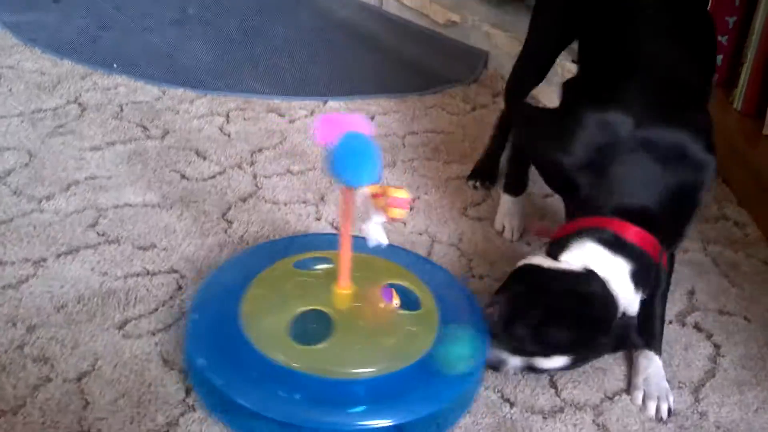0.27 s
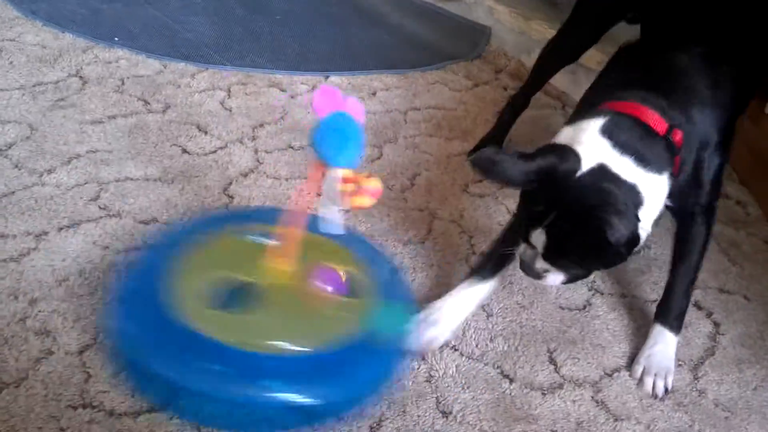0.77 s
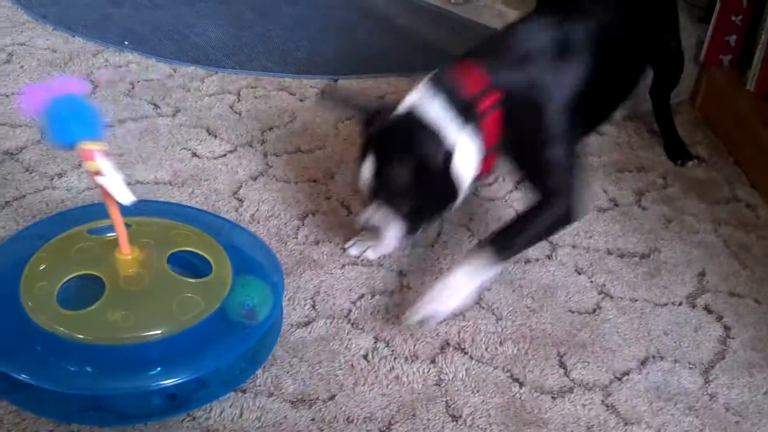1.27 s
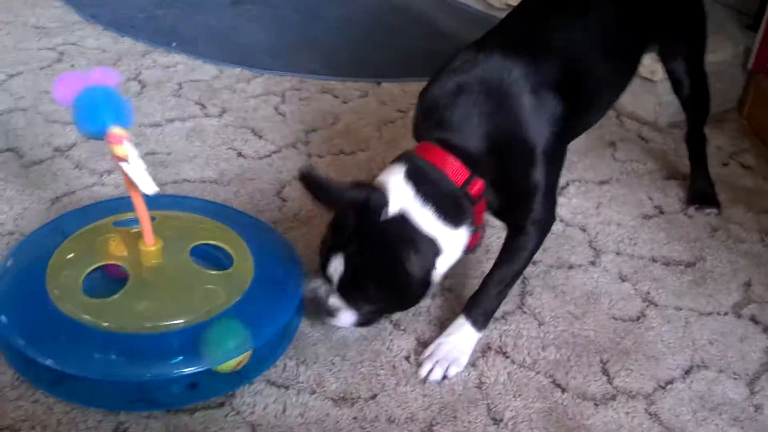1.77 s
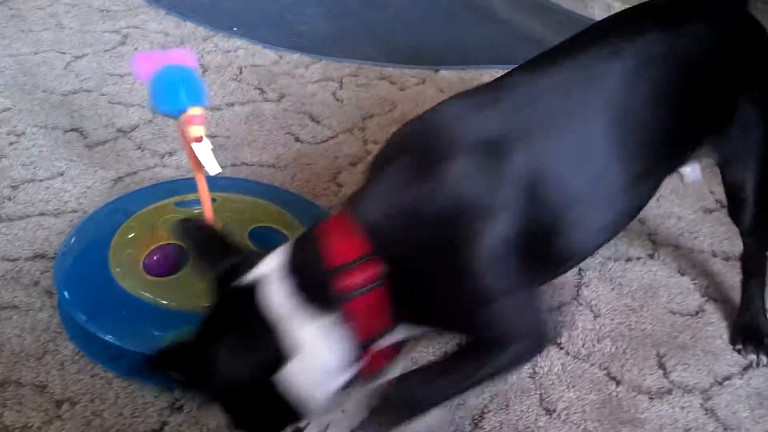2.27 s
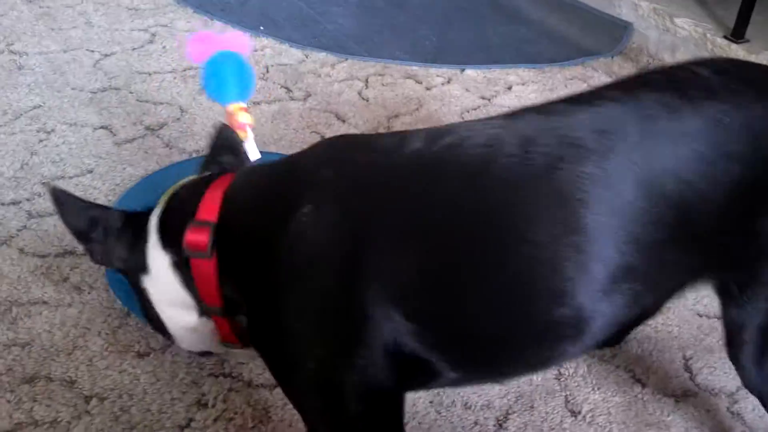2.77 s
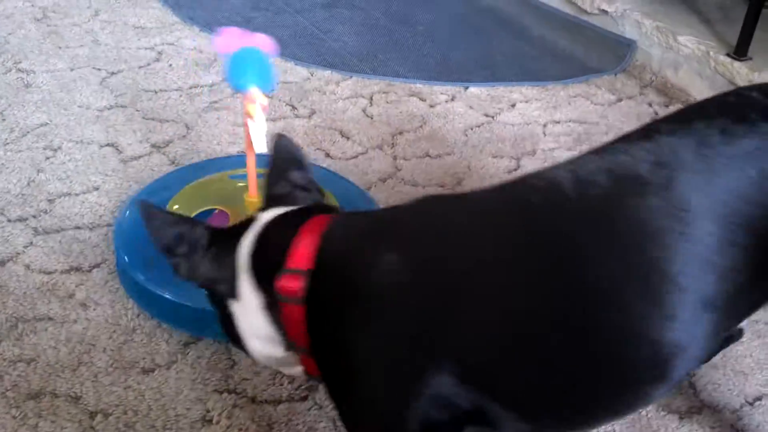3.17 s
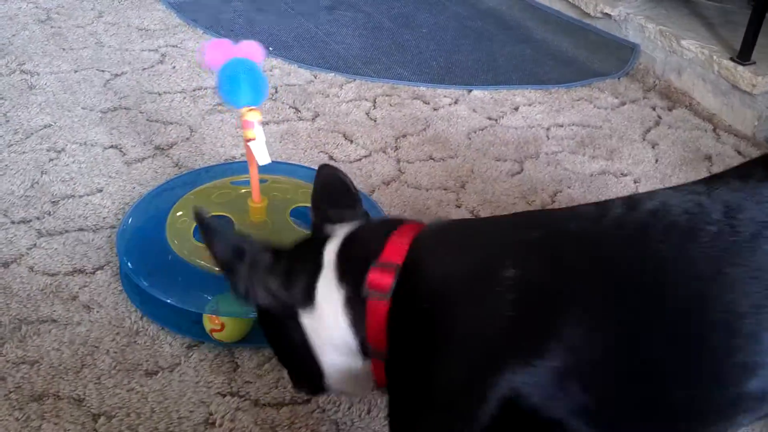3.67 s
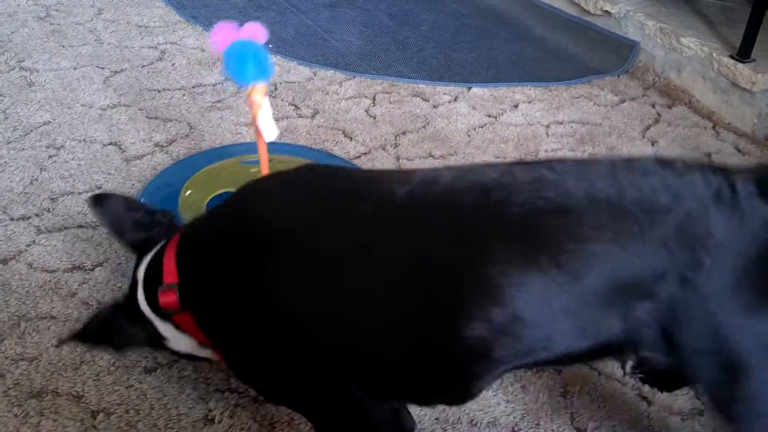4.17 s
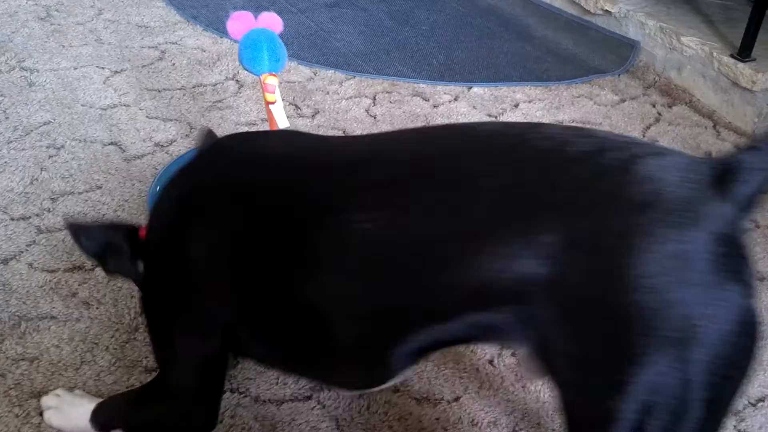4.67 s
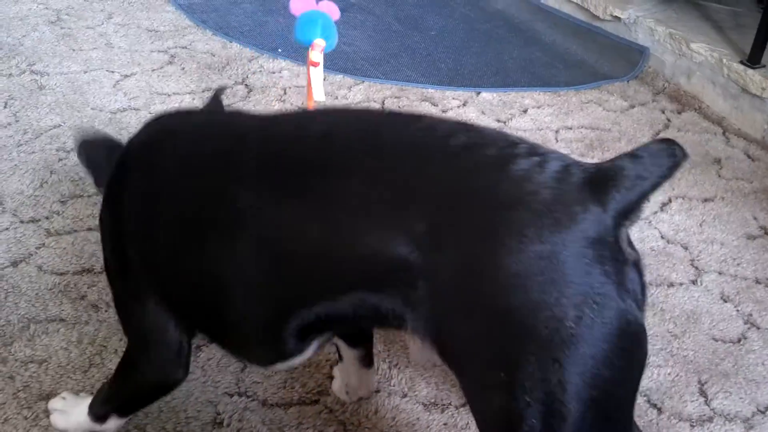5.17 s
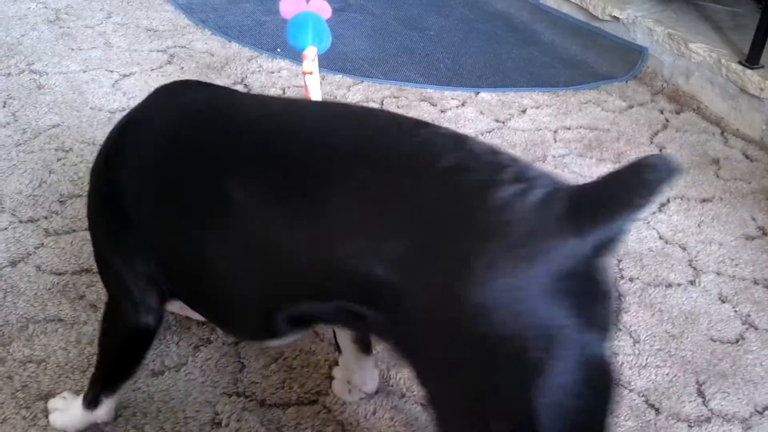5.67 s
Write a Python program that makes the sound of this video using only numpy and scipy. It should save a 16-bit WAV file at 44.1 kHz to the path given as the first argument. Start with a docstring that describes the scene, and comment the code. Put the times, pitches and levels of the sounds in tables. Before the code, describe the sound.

Irregular hollow plastic knocks and a pattering ball as a dog nudges a toy indoors, with light tag jingles and snuffles.

```python
"""A small dog plays with a round plastic track toy on a carpet, a metre away. Over a faint room hum its paws
thump and its collar tag tinkles in high metal modes. Then blows set the toy's hollow shell ringing, claws
click on the rim, the nose puffs turbulent air and the shoved ball patters round its track. These return in
uneven bouts, the hardest knock near 3 s. Throughout, a small living room reflects each sound, and two
microphone ports that partly cancel each other give a wide image."""
import sys
import numpy as np
from scipy import signal
from scipy.fft import rfft, irfft, next_fast_len
from scipy.io import wavfile

SR = 44100
rng = np.random.default_rng(int(sys.argv[2]) if len(sys.argv) > 2 else 0)


def persist_wave(psi):
    """Save psi, clipped to +-1, as 16-bit WAV."""
    counts = np.round(np.clip(psi, -1, 1) * 32767).astype(np.int16)
    wavfile.write(sys.argv[1], SR, np.atleast_2d(counts).T)


N = 260631
TIME = np.arange(N) / SR
PORT_GAP_SAMPLES = 16  # travel time of sound between the two ports

# spectrum of a hard contact's sharp tick: frequency_hz, level_db
TICK_SPECTRUM = [(3500, -11.5), (6000, -7.5), (8700, -0.5), (11000, 0.5), (13500, -8), (16000, 3.5)]
# spectrum of the plastic rim's clack: frequency_hz, level_db
CLACK_SPECTRUM = [(1200, -21), (1900, 8.5), (2400, 3.5), (2900, 0), (3500, 1.5), (4400, -7), (5500, -16),
                  (9000, -42)]


def undb(db):
    """Decibels to amplitude ratio."""
    return 10 ** (np.asarray(db) / 20)


def along(rows, hz, axis=1):
    """Interpolation of a table column over log frequency."""
    rows = np.array(rows, float)
    return np.interp(np.log(hz + 1), np.log(rows[:, 0]), rows[:, axis])


def colour(x, spectrum):
    """Linear filtering by a spectrum of frequency_hz, level_db points."""
    size = next_fast_len(x.shape[-1] + 512)
    gain = undb(along(spectrum, np.fft.rfftfreq(size, 1 / SR)))
    return irfft(rfft(x, size) * gain, size)[..., :x.shape[-1]]


def noise(spectrum, size):
    """Incoherent coloured noise at the two ports, rms 1."""
    x = colour(rng.standard_normal((2, size)), spectrum)
    return x / x.std()


def diffuse(x):
    """Diffuse-field coherence: the ports are alike in the bass, unrelated in the treble."""
    size = next_fast_len(x.shape[-1])
    coherence = .9 * np.sinc(2 * np.fft.rfftfreq(size) * PORT_GAP_SAMPLES)
    mid, side = irfft(rfft(x, size) * np.sqrt([1 + coherence, 1 - coherence]), size)[:, :x.shape[-1]]
    return np.array([mid + side, mid - side]) / np.sqrt(2)


def from_left(x, lag_s=.00007, far_db=-0.3):
    """Path difference: a near source reaches the right port later and weaker."""
    i = np.arange(len(x))
    return np.array([x, undb(far_db) * np.interp(i - lag_s * SR, i, x)])


def add(out, start_s, x):
    """Superposition of a sound from start_s on."""
    i = max(int(start_s * SR), 0)
    out[:, i:i + x.shape[-1]] += x[:, :max(N - i, 0)]


def flex(t, hz, cycles):
    """Damped oscillation of a surface pushed in and springing back, peak near 1."""
    turns = t * hz
    swell = (1 - np.exp(-(turns / 0.72) ** 2)) * np.exp(-turns / (1.09 * max(cycles, .1)))
    return swell / swell.max() * np.sin(2 * np.pi * turns)


def ring(t, modes, scatter_db, detune):
    """Free decay of normal modes; every blow lands elsewhere and weights them anew."""
    hz, db, t60 = np.transpose(modes)[:, :, None]
    weight, shift, phase = rng.standard_normal((3, len(modes), 1))
    swing = np.sin(2 * np.pi * (hz * (1 + detune * shift) * t + phase))
    return undb(db + scatter_db * weight - 60 * t / t60) * swing


def crack(spectrum, t, rise_s, fall_s):
    """A contact transient: a noise burst whose energy is set by its envelope."""
    envelope = (1 - np.exp(-t / rise_s)) * np.exp(-t / fall_s)
    burst = noise(spectrum, len(t)) * envelope
    return burst * np.linalg.norm(envelope) / np.linalg.norm(burst, axis=1, keepdims=True)


def background():
    """A diffuse field of rumble and hiss, with a hum modulated in amplitude and phase."""
    # course of the background: time_s, level_db
    levels = [(0, -57), (.28, -51.5), (.5, -60.5), (.78, -61), (1.2, -73), (1.7, -70), (2.3, -62),
              (3.9, -59), (4.5, -54), (5.91, -55)]
    # rumble and hiss: frequency_hz, level_db
    air_spectrum = [(30, -16.5), (70, -3.5), (120, 0.5), (200, -0.5), (330, -4), (700, -7), (1400, -9.5),
                    (2400, -18), (4000, -21), (8000, -27.5), (12000, -26), (16000, -20.5)]
    hum_hz = 120.6
    waver = np.interp(TIME, np.linspace(0, TIME[-1], 30), rng.standard_normal(30))
    hum = undb(2 * waver) * np.sin(2 * np.pi * hum_hz * TIME + 0.45 * waver)
    ambience = diffuse(noise(air_spectrum, N)) + from_left(hum, lag_s=0.00014, far_db=-5)
    return ambience * undb(np.interp(TIME, *np.transpose(levels)))


def paws():
    """Soft impact: paws and the toy's base on the carpet excite only low, damped swings."""
    # thumps on the carpet: start_s, level_db, pitch_hz
    thumps = [(0.03, -61, 132), (.15, -42, 137), (0.546, -53, 142), (.795, -65, 54.6), (2.154, -52, 139),
              (2.998, -50, 50), (3.538, -37, 145), (4.563, -45.5, 149), (4.67, -48.5, 80)]
    out = np.zeros((2, N))
    for start, db, hz in thumps:
        add(out, start, from_left(undb(db) * flex(TIME[:SR // 5], hz, cycles=3.3)))
    return out


def tag():
    """Modal ringing of metal: the tag strikes its ring and rebounds twice, each time with a scrape."""
    # shakes of the collar: start_s, level_db
    shakes = [(.183, -44), (0.412, -32.5), (.505, -37), (.549, -36), (1.297, -57), (1.317, -50),
              (1.479, -45), (1.793, -54), (2.084, -41), (2.433, -44.5), (2.514, -48), (2.744, -48),
              (2.789, -41.5), (3.01, -31), (3.073, -41), (3.347, -47), (3.69, -50.5), (3.742, -51),
              (3.846, -52), (4.37, -35.5), (4.441, -44), (4.481, -42), (4.661, -42), (4.696, -42),
              (4.732, -41.5), (5.478, -46), (5.543, -44.5), (5.596, -32), (5.612, -41), (5.684, -37)]
    # modes of the free tag: frequency_hz, level_db, t60_s
    tag_modes = [(6890, -21.5, .05), (7400, -16.5, 0.15), (9240, -10, 0.073), (10060, -9, 0.082),
                 (11270, 2.5, 0.08), (11360, -1.5, 0.062), (11800, -14, .07), (12800, -2, 0.066),
                 (13190, -4, 0.046), (12920, 1, 0.2), (13500, -10, .04), (14900, -5, .06), (15280, -3, .09)]
    # faint clinks while the dog keeps its nose at the toy, one somewhere in each slot
    slot_s = .25
    jiggles = [(s + slot_s * rng.random(), -52.5 + 3 * rng.standard_normal())
               for s in np.arange(2.1, TIME[-1], slot_s)]
    out, t = np.zeros((2, N)), TIME[:SR // 8]
    collar_damping = np.exp(-t / 0.03)
    for start, db in shakes + jiggles:
        delays = np.cumsum([0, *rng.uniform(0.002, 0.0087, 2)])
        for bounce, delay in enumerate(delays):
            modes = ring(t, tag_modes, scatter_db=3.5, detune=0.0018) * collar_damping
            # a contact near a nodal line leaves that mode almost silent
            modes = modes * 1.47 * np.cos(rng.uniform(0, np.pi, (len(modes), 1)))
            # such short waves reach each port with their own sign
            tinkle = rng.choice([-1, 1], (2, len(modes))) @ modes
            scrape = crack(TICK_SPECTRUM, t, rise_s=0.00023, fall_s=0.002)
            add(out, start + delay, undb(db - 5 * bounce) * (undb(-10) * tinkle + undb(-1.5) * scrape))
    return out


def blow(knock_db, hz, tick_db, thud_db, cycles):
    """Impulse response of the toy: lid and base flex, the shell rings, the rim cracks, parts rattle."""
    # modes of the hollow shell: frequency_hz, level_db, t60_s
    shell_modes = [(197.6, -13.5, .18), (321, -16.5, 0.11), (375.3, -19, 0.15), (516.8, -9, 0.13),
                   (555, -15.5, .08), (644.6, -20.5, 0.24), (743, -26.5, 0.034), (849.8, -14, 0.037),
                   (919, -15, 0.11), (1060.6, -10, 0.072), (1137, -17.5, 0.063), (1203, -23, 0.087),
                   (1360, -13.5, 0.054), (1543, -16.5, 0.053), (1734, -24.5, 0.036), (1860, -35, 0.038)]
    # loose parts buzzing against the plastic: frequency_hz, level_db
    rattle_spectrum = [(1000, -22.5), (1800, 7.5), (2700, -0.5), (3600, 1.5), (5200, -9), (9000, -5.5),
                       (15000, -2.5)]
    t = TIME[:SR // 5]
    # the contact time picks out the modes near the blow's own pitch
    octaves_off = np.log2(np.array(shell_modes)[:, :1] / hz)
    excitation = (1 - np.exp(-t / 0.00083)) / (1 + (octaves_off / 1.22) ** 2)
    modes = excitation * ring(t, shell_modes, scatter_db=1.5, detune=0.011)
    # every mode radiates in its own pattern, so the two ports weight them differently
    directivity = 1 + 0.26 * rng.standard_normal((2, len(shell_modes)))
    shell = undb(knock_db - 3.5) * directivity @ modes
    lid = undb(knock_db) * flex(t, hz, cycles)
    base = undb(thud_db) * flex(t, 250 * np.exp(0.11 * rng.standard_normal()), cycles=0.46)
    panels = from_left(lid + base, lag_s=0.00013, far_db=-0.5)
    clack_db = 0.72 * knock_db + 0.28 * tick_db - 10.5
    clack = undb(clack_db) * crack(CLACK_SPECTRUM, t, rise_s=0.0006, fall_s=0.0027)
    tick = undb(tick_db + 1.5) * crack(TICK_SPECTRUM, t, rise_s=0.00018, fall_s=0.0017)
    # the rattle grows faster than the blow and comes in uneven spurts
    spurts = undb(5 * np.interp(t, np.linspace(0, t[-1], 70), rng.standard_normal(70)))
    rattle = undb(1.174 * knock_db - 25) * spurts * crack(rattle_spectrum, t, rise_s=0.0067, fall_s=0.025)
    return panels + shell + clack + tick + rattle


def knocks():
    """Impact excitation of the toy: soft, low blows push its base harder."""
    # blows on the toy: start_s, level_db, pitch_hz, tick_db
    strikes = [(0.2268, -25.5, 540, -57), (.232, -30, 646, -53), (.249, -28, 700, -70),
               (0.264, -29.5, 596, -22.5), (.3, -35, 1370, -26), (.317, -17, 1040, -22),
               (0.7114, -27.5, 630, -61), (0.7644, -22, 1210, -26), (0.7867, -25, 1220, -32),
               (0.8027, -22, 1230, -13), (.819, -25, 990, -49), (.927, -30, 660, -44),
               (1.01, -43.5, 520, -80.5), (1.526, -38.5, 1040, -40.5), (1.547, -36.5, 686, -46),
               (1.573, -32.5, 1010, -43), (1.5964, -30, 700, -33.5), (1.871, -43.5, 610, -63),
               (1.96, -47, 1000, -60), (2.234, -42, 642, -71.5), (2.429, -35, 800, -55),
               (2.434, -32.5, 940, -59), (2.454, -28.5, 634, -76), (2.566, -31, 830, -74),
               (2.672, -43, 514, -68), (2.796, -42, 580, -68), (2.94, -37.5, 1000, -29.5),
               (2.9704, -23, 793, -34.5), (2.991, -25.5, 720, -33), (2.998, -7.5, 1080, -27.5),
               (3.0223, -18.5, 925, -46), (3.061, -21, 627, -51), (3.1, -29, 1140, -45),
               (3.367, -36.5, 665, -72), (3.6206, -23.5, 1060, -47), (3.642, -27.5, 475, -63),
               (4.054, -27.5, 860, -42), (4.074, -16.5, 860, -67), (4.12, -19.5, 910, -28.5),
               (4.148, -22, 810, -58), (4.3508, -27.5, 434, -70), (4.6408, -33.5, 430, -70),
               (4.756, -27.5, 587, -82), (4.905, -41, 695, -72), (4.972, -35, 880, -48.5),
               (5.051, -35.5, 532, -77), (5.086, -33, 796, -72), (5.141, -29, 1200, -46),
               (5.2792, -21.5, 1057, -32.5), (5.299, -29, 760, -59), (5.7623, -20.5, 903, -55),
               (5.7818, -20.5, 1370, -26), (5.897, -36.5, 510, -68)]
    thud_db_per_octave = -8
    out = np.zeros((2, N))
    for start, db, hz, tick_db in strikes:
        thud_db = db - 11.5 + thud_db_per_octave * np.log2(hz / 835)
        add(out, start, blow(db, hz, tick_db, thud_db, cycles=0.6))
    return out


def ball_taps():
    """Elastic rebound: the ball springs clear, so its knocks ring a little longer, with a light thud."""
    # the ball against the wall of its track: start_s, level_db, pitch_hz
    taps = [(.3245, -18.5, 508), (1.607, -33.5, 1010), (1.71, -43.5, 960), (1.994, -39.5, 1050),
            (2.547, -26.5, 860), (2.601, -38.5, 845), (3.426, -45, 1136), (3.446, -34.5, 1016),
            (4.237, -27, 870), (5.1783, -18.5, 1000)]
    out = np.zeros((2, N))
    for start, db, hz in taps:
        add(out, start, blow(db, hz, tick_db=db - 31, thud_db=db - 14.5, cycles=2.34))
    return out


def claws():
    """Brief, hard contact: a claw ticks and clacks on the rim, too light to ring the shell."""
    # claws on the rim: start_s, level_db
    clicks = [(.3245, -23.5), (0.5656, -21.5), (0.692, -24), (1.709, -45), (4.082, -30)]
    out, t = np.zeros((2, N)), TIME[:SR // 20]
    for start, db in clicks:
        add(out, start, undb(db + 2.5) * crack(TICK_SPECTRUM, t, rise_s=0.0003, fall_s=0.0019))
        add(out, start, undb(db - 20.5) * crack(CLACK_SPECTRUM, t, rise_s=.0004, fall_s=.0022))
    return out


def snuffles():
    """Turbulent flow: puffs through the nose hiss, whistle in the nostrils and sound in the muzzle."""
    # puffs of breath: start_s, peak_s, end_s, hiss_db, whistle_db, muzzle_db
    puffs = [(.385, 0.437, 0.63, -40, -50, -46.5), (2.596, 2.666, 3.06, -57, -68, -64),
             (3.494, 3.543, 3.63, -57.5, -67, -55), (4.44, 4.51, 4.69, -60, -70, -53),
             (4.737, 4.823, 4.92, -62, -56, -70), (5.423, 5.53, 5.47, -50, -60.5, -51)]
    # spectra of the breath: frequency_hz, level_db
    hiss_spectrum = [(1500, -1.5), (2200, -7.5), (5000, -2.5), (8500, -2), (12000, -4), (16000, -2.5)]
    whistle_spectrum = [(2900, -36), (3400, -0.5), (3680, -5), (3950, -9.5), (4500, -26.5)]
    muzzle_spectrum = [(150, -27.5), (400, 2), (1400, 5), (2200, -2.5), (4000, -41)]
    out, flutter_times = np.zeros((2, N)), TIME[::SR // 90]
    for start, peak, end, hiss_db, whistle_db, muzzle_db in puffs:
        t = TIME[:int(max(end - start, .02) * SR)]
        flow = np.interp(start + t, [start, peak, end], [0, 1, 0]) ** 1.65
        whistle = undb(whistle_db) * noise(whistle_spectrum, len(t))
        hiss = undb(hiss_db) * noise(hiss_spectrum, len(t))
        muzzle = undb(muzzle_db) * diffuse(noise(muzzle_spectrum, len(t)))
        flutter = undb(3.7 * np.interp(t, flutter_times, rng.standard_normal(len(flutter_times))))
        add(out, start, undb(-2) * flow * flutter * (hiss + whistle + muzzle))
    return out


def ball_roll():
    """Rolling noise: the ball patters over seams, sped up by each shove and braked evenly by friction."""
    # shoves of the ball: fastest_s, level_db, braking_s
    shoves = [(.85, -41.5, 0.28), (1.65, -51, 0.26), (2.48, -51.5, 0.89), (3.07, -36, 0.2),
              (4.15, -39, 0.29), (5.15, -42, 0.42)]
    # response of the track: frequency_hz, level_db
    track_spectrum = [(120, -14.5), (220, -1.5), (500, 2), (1100, -5.5), (1500, 0.5), (2500, -26),
                      (6000, -37)]
    bumps_per_s, rise_s, speed_exponent = 190, 0.19, 2.37
    bumps = (rng.random(N) < bumps_per_s / SR) * rng.choice([-1, 1], N)
    sizes = undb(4.34 * np.minimum(rng.exponential(size=N), 4))  # many tiny, a few larger
    pulse = flex(TIME[:SR // 50], 735, cycles=0.16)
    patter = colour(signal.fftconvolve(bumps * sizes, pulse)[:N], track_spectrum)
    envelope = sum(undb(db) * np.interp(TIME, [s - rise_s, s, s + braking_s], [0, 1, 0]) ** speed_exponent
                   for s, db, braking_s in shoves)
    return from_left(patter / patter.std() * undb(-4.5) * envelope)


def room(x):
    """Reverberation: a few early reflections, then a diffuse tail that lasts longest in the bass."""
    # reflections from hearth, wall and ceiling: delay_s, level_db, right_lag_s
    echoes = [(.0062, -22.5, -0.0058), (0.011, -13.5, 0.004), (0.02, -18, .0001)]
    # reverberant tail: frequency_hz, level_db, t60_s
    tail = [(100, -11, 1), (300, -4, 0.19), (1003, -4, 0.26), (3500, -3, 0.24), (8900, -9.5, 0.15),
            (15810, -7.5, 0.206)]
    t = TIME[:SR // 2]
    hz = np.fft.rfftfreq(len(t), 1 / SR)
    octaves_hz = 62.5 * 2 ** np.arange(9)
    wash, response = rfft(diffuse(rng.standard_normal((2, len(t))))), 0
    build_up = 1 - np.exp(-(t / 0.0047) ** 2)
    for centre, share in zip(octaves_hz, np.eye(len(octaves_hz))):
        band = irfft(wash * np.interp(np.log(hz + 1), np.log(octaves_hz), share), len(t))
        fade = undb(-60 * t / along(tail, centre, axis=2)) * build_up
        response = response + band * fade / np.linalg.norm(fade) * undb(along(tail, centre))
    # rough surfaces return only the lower frequencies in one piece
    smear = np.array([1, 2, 3, 2, 1]) / 9
    for delay, db, lag in echoes:
        for port, start in enumerate([int(delay * SR), int((delay + lag) * SR)]):
            response[port, start:start + len(smear)] += undb(db) * smear
    return x + signal.fftconvolve(x[:1], response, axes=1)[:, :N]


def scene():
    """Superposition at the two ports: the background, and dog and toy with their reverberation."""
    direct = paws() + tag() + knocks() + ball_taps() + claws() + snuffles() + ball_roll()
    return background() + room(direct)


def record(dry):
    """Differential microphone: each channel is one port minus the delayed other, equalised, top cut."""
    # lift that makes up for the bass the ports cancel: frequency_hz, gain_db
    equaliser = [(30, 5.5), (90, -0.5), (180, 2), (320, 9.5), (600, -3), (1200, -4.5), (2500, -0.5),
                 (16000, -3)]
    cutoff_hz = 15900
    other = np.pad(dry[::-1], ((0, 0), (PORT_GAP_SAMPLES, 0)))[:, :N]
    wide = colour(dry - other, equaliser)
    return signal.sosfilt(signal.ellip(8, .2, 70, cutoff_hz, fs=SR, output="sos"), wide)


dry = scene()
out = record(dry)
persist_wave(out)
```